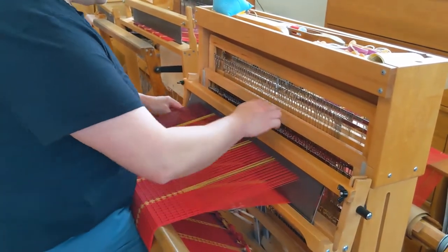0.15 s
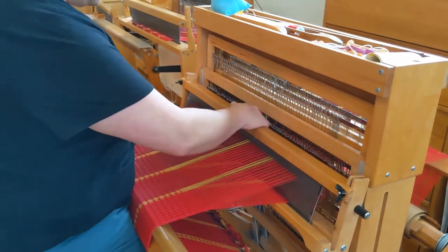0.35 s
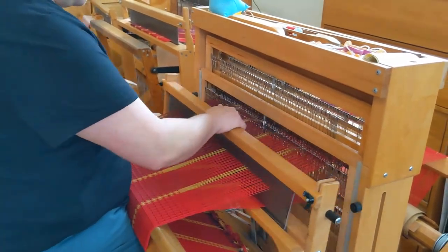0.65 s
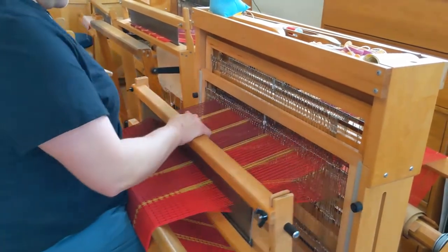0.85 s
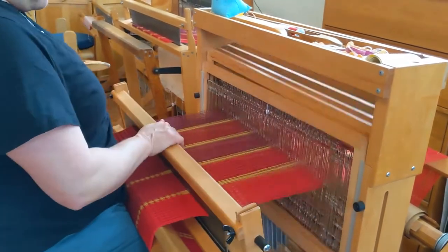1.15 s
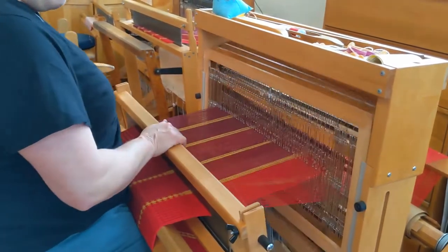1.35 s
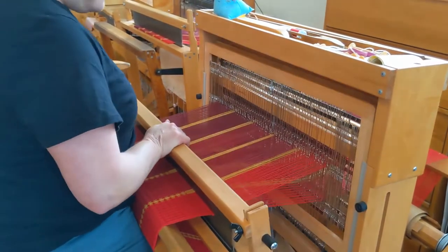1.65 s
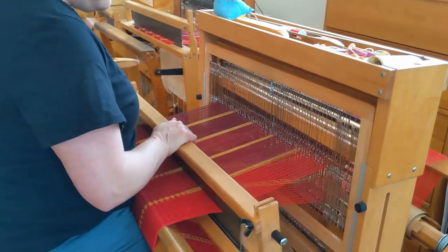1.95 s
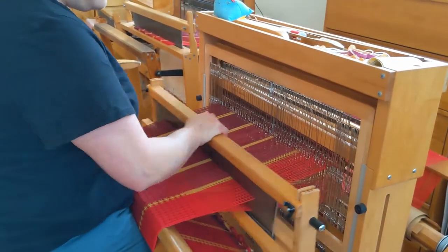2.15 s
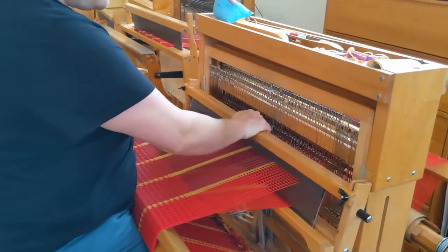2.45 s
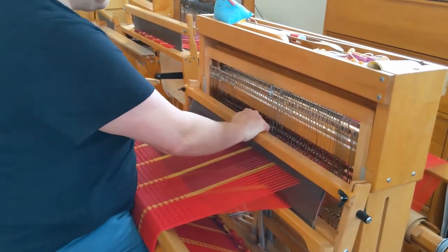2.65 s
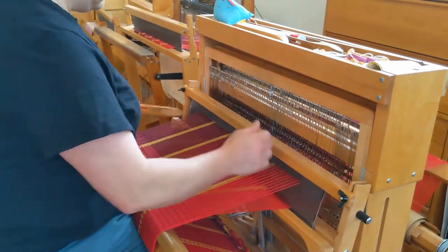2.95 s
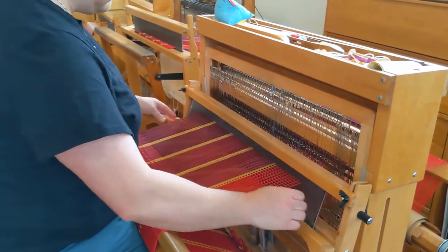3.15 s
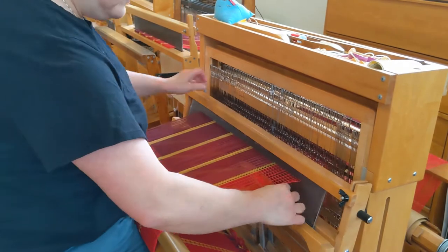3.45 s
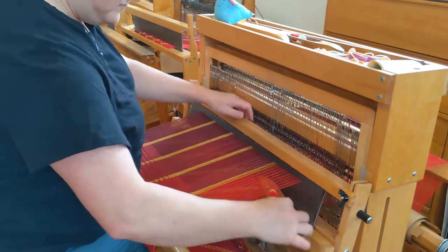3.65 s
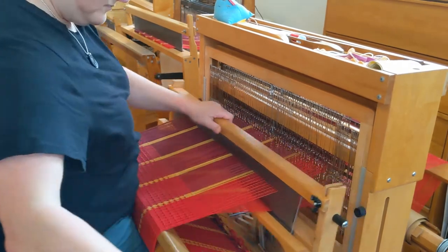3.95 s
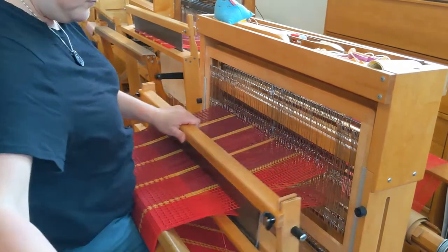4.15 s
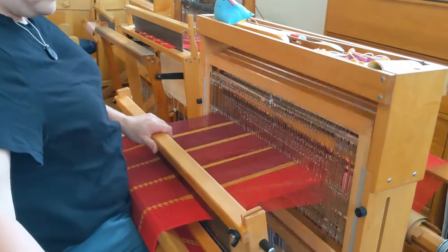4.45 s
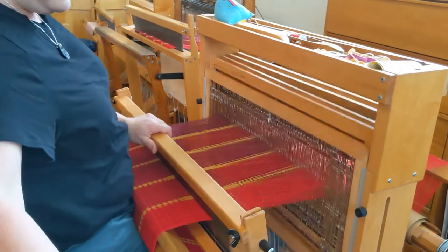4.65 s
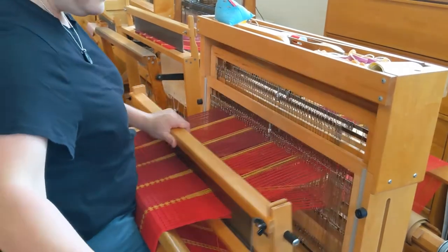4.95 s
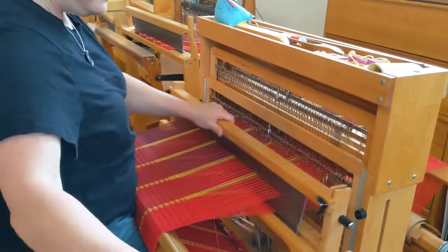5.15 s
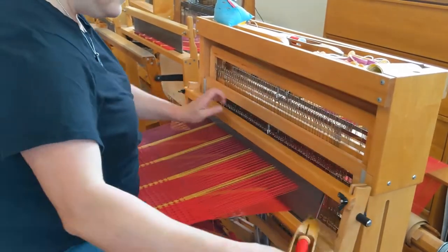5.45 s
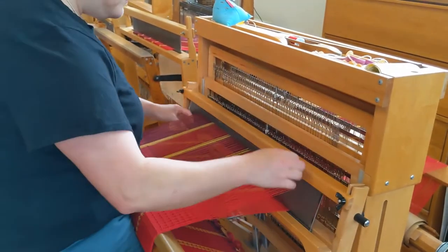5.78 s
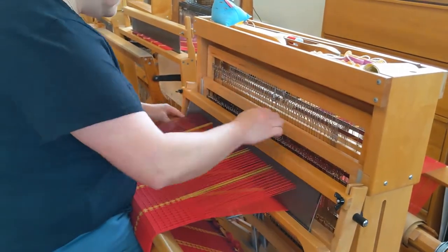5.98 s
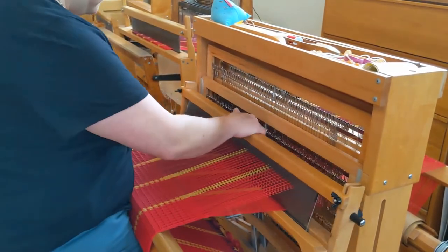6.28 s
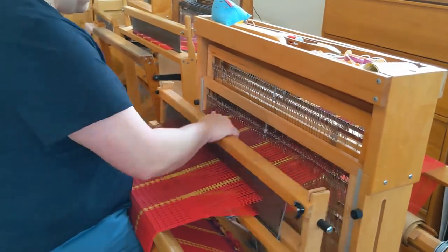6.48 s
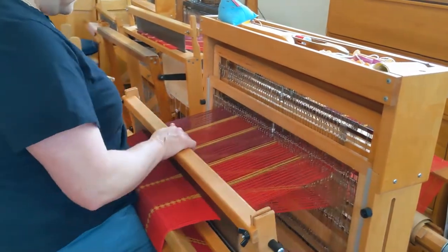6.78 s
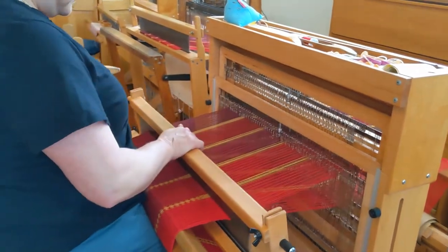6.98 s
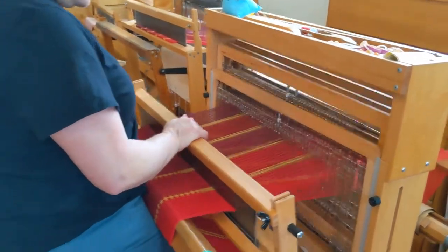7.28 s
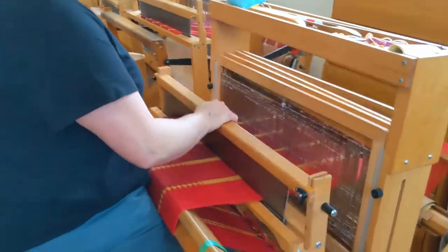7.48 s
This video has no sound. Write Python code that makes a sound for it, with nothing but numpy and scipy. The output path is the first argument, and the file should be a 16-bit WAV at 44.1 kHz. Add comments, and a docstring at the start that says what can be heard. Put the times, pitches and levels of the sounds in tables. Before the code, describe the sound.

A wooden floor loom works in an uneven cycle. A bobbin rattles in its shuttle, then wood knocks and thuds while loose metal heddles jingle. This happens three times, with a few faint, brief squeaks from the pivots, and ends on a strong jingling thud. Something briefly bumps the microphone on the right before the second rattle. The room has a short echo and a faint steady hum.

```python
"""A large studio with a wooden floor loom at work. Shafts drop and their loose metal heddles jingle over
wooden thuds, the bobbin rattles in the shuttle as yarn is drawn off, and the beater swings its reed.
Pivots squeak by stick-slip, and something brushes the right microphone port.
Air and building hum lie underneath."""
import sys
import numpy as np
from scipy import signal
from scipy.fft import rfft, irfft, next_fast_len
from scipy.io import wavfile

SR = 44100
rng = np.random.default_rng(int(sys.argv[2]) if len(sys.argv) > 2 else 0)


def transcribe(signal):
    """Save signal, clipped to [-1, 1], as a 16-bit WAV file at the path in sys.argv[1]."""
    frames = np.atleast_2d(signal).T
    limited = np.clip(frames, -1, 1)
    pcm = np.round(limited * 32767).astype(np.int16)
    wavfile.write(sys.argv[1], SR, pcm)


N = 336075
N_FFT = next_fast_len(N)
BIN_HZ = np.maximum(np.fft.rfftfreq(N_FFT, 1 / SR), 1)

# left-right coherence: f/Hz, coherence
COHERENCE = [(60, 0.9), (180, 1), (550, 0.86), (1650, 0.19), (4970, 0.015), (15000, 0.01)]


def heddles():
    """Loose heddles tick against their bars; a few strike harder and ring briefly."""
    # heddle and reed motion, per stroke: t/s, level/dB, treble lift/dB
    strokes = [
        [(0.0, -56, -4), (0.022, -40.5, -21), (0.148, -48.5, -23), (0.16, -21, -7)],
        [(1.0, -53, 0), (1.122, -45, 0), (1.164, -30.5, 2), (1.26, -35, -6), (1.284, -18.5, 0),
         (1.33, -26, 2.5), (1.444, -35, -3.5), (1.49, -19.5, 1.5), (1.664, -47.5, -5), (1.734, -36, -4.5),
         (1.99, -66.5, -18), (2.0, -55, 6)],
        [(2.54, -55, -2), (2.552, -61, 0), (2.57, -29, -9), (2.776, -48.5, -2), (2.8, -46, 13)],
        [(4.38, -49, 9), (4.408, -27.5, -1.5), (4.608, -40, -6), (4.728, -30.5, 7), (4.796, -36, -7),
         (4.85, -27.5, -3), (4.868, -16, 2), (5.032, -43, -10.5), (5.296, -56.5, -9), (5.392, -48.5, -4),
         (5.41, -31.5, -4), (5.644, -52, -5.5), (5.652, -53, 0), (5.66, -32, 0)],
        [(5.95, -48, -12), (5.99, -39, -16), (6.042, -38, -10), (6.2, -49, -15)],
        [(6.87, -60, 19), (6.902, -28.5, -15), (7.202, -63, 2.5), (7.302, -40.5, -0.5), (7.438, -42, 1),
         (7.494, -34.5, -9), (7.51, -24.5, -0.5), (7.568, -33.5, 1), (7.62, -13.5, 0)],
    ]
    # jingle spectrum: f/Hz, density/dB
    spectrum = [(530, -17), (900, -6), (1230, -11), (1390, -8.5), (1720, -11), (2020, -3.5), (2250, -4.5),
                (4360, -1), (7770, -15.5), (10000, -10.5), (12400, -18.5), (15100, -19), (16000, -41)]
    ticks = contacts(per_s=5000, spread_db=1) * from_db(0.64 * wander(rate_hz=30))
    jingle = rms_one(stereo_colour(ticks, spectrum))
    wire_modes = [(hz, at_hz(spectrum, hz), 40 / hz) for hz in np.geomspace(1300, 11000, 18)]
    strikes = contacts(per_s=35, spread_db=3.5)
    rings = rms_one(resonate(wire_modes, lambda hz: np.roll(strikes, rng.integers(N), axis=1)))
    return shape_strokes(rms_one(jingle + from_db(-5.5) * rings), strokes, corner_hz=6060)


def bobbin():
    """The loose bobbin chatters, rubs and knocks in the hollow shuttle; mode strengths drift as it shifts."""
    # bobbin spin, per stroke: t/s, level/dB, treble lift/dB
    strokes = [
        [(0.14, -60, -2), (0.148, -58, -9), (0.158, -27, 1.5), (0.392, -51, -3), (0.422, -36, -5),
         (0.432, -33.5, 5.5), (0.574, -42, 2), (0.59, -37, 1), (0.634, -45, 9), (0.65, -34.5, 3),
         (1.034, -48.5, -2.5), (1.072, -44, -7), (1.12, -51, 0)],
        [(3.13, -101, -17), (3.174, -37.5, 2), (3.286, -33.5, 1.5), (3.42, -43.5, -4), (3.444, -38, 4.5),
         (3.48, -36, -10), (3.504, -29.5, 7), (3.694, -29, -1), (3.83, -51, 4), (3.856, -21.5, 2),
         (4.02, -34, 0.5), (4.29, -37.5, -12), (4.322, -51, 2), (4.332, -27.5, -25), (4.364, -47, 4),
         (4.39, -54, -3)],
        [(5.64, -70, -4), (5.656, -25.5, -5), (5.702, -41.5, 0), (5.782, -34.5, 0.5), (5.864, -34.5, -2.5),
         (5.874, -28, 4), (5.896, -24, 1.5), (5.906, -29.5, 1.5), (5.99, -37.5, 4.5), (6.042, -33.5, 12),
         (6.184, -35.5, -2), (6.44, -35, 6.5), (6.684, -37, 2), (6.752, -52.5, 4), (6.878, -47.5, 2),
         (6.9, -31, 16)],
    ]
    # hard knocks on the shuttle: t/s, level/dB, favoured f/Hz
    hits = [(0.1556, -21, 2530), (0.4303, -17, 2580), (0.6454, -28.5, 2610), (3.174, -22.5, 2990),
            (3.2634, -19.5, 3030), (3.2778, -19, 2430), (3.4402, -26, 2670), (3.5085, -11, 2600),
            (3.5146, -17, 2530), (3.592, -23, 2600), (3.6805, -20.5, 2960), (3.8433, -17, 1950),
            (3.8554, -7.5, 1600), (3.9091, -20, 2330), (3.947, -12, 2560), (4.0763, -21, 4830),
            (4.1079, -16, 2550), (4.2585, -29.5, 2570), (4.3295, -27, 2560), (5.6523, -20, 1800),
            (5.784, -22.5, 2500), (5.8725, -22, 1620), (5.8877, -16, 2600), (6.031, -30, 2550),
            (6.2509, -35, 2380)]
    # shuttle and bobbin modes: f/Hz, level/dB, t60/s
    modes = [(1270, -30, 0.0092), (1602, -6.5, 0.03), (1940, -15.5, 0.036), (2358, -4, 0.027),
             (2524, -5, 0.047), (2688, 4.5, 0.0094), (2906, -2, 0.019), (3136, -8.5, 0.028),
             (4004, -1, 0.0096), (4750, -7, 0.017), (5377, -0.5, 0.0095), (6090, -5, 0.0076),
             (8740, -12, 0.014), (10070, -2.5, 0.0018)]
    kicks = np.abs(contacts(per_s=70, spread_db=3)[0])
    bounces = signal.lfilter([1], [1, -np.exp(-1 / (0.003 * SR))], kicks)   # 3 ms decay
    ticks = contacts(per_s=2500, spread_db=3) * (1 + 0.8 * rms_one(bounces))

    def force(hz):
        return np.roll(ticks, int(hz / 20), axis=1) * from_db(4.86 * wander(rate_hz=7))

    chatter = rms_one(resonate(modes, force))
    rattle = rms_one(chatter + from_db(-3) * yarn_rub())
    blows = knocks(hits, modes, fall_db_oct=4.5, gain_db=0.5, contact_s=0.003, crack_db=-8)
    sound = shape_strokes(rattle, strokes, corner_hz=3480) + blows
    return butterworth(sound, 3, [1150, 12500], "band")   # too small for bass, too soft for top treble


def yarn_rub():
    """Yarn and bobbin friction: dense, nearly even contacts."""
    # rub spectrum: f/Hz, density/dB
    spectrum = [(710, -55), (1200, -74), (1580, -22), (1760, -6), (3060, 3.5), (3500, -14), (5440, -7.5),
                (8640, -20), (14000, -57)]
    return rms_one(stereo_colour(contacts(per_s=7600, spread_db=0.5), spectrum))


def frame():
    """Joints bump and knock in the wooden frame, which stands on hollow boards."""
    # shaking by treadles, shafts and beater: t/s, level/dB, boom re rumble/dB
    shaking = [(0.0, -44, -13.5), (0.02, -53.5, -14), (0.87, -66, -6), (1.31, -37, -13.5),
               (1.44, -43.5, -8), (1.48, -35.5, -1), (1.68, -54, -11), (1.74, -45.5, -11), (1.97, -60, -7),
               (2.52, -77, 7), (2.59, -33.5, -13), (2.74, -52, -1), (2.8, -43, -14), (2.84, -67, 7),
               (2.97, -67, 1), (3.05, -59, 7), (3.1, -77, 20), (3.18, -40, -24), (3.4, -59, 3),
               (3.46, -40, -7.5), (3.65, -48, -15), (4.29, -70.5, 2), (4.43, -40.5, -12), (4.65, -38, -19),
               (4.79, -50, -8), (4.86, -30.5, -14), (4.92, -37.5, -7.5), (5.2, -60.5, -8), (5.39, -61, 3),
               (5.41, -30.5, -10.5), (5.62, -54, -10), (5.67, -37.5, -31), (5.71, -42.5, -20),
               (5.86, -48.5, -11), (5.88, -38, -19), (5.94, -47.5, -8), (6.07, -44.5, -27),
               (6.18, -58.5, -13), (6.77, -60.5, 1), (6.94, -45, -8.5), (7.24, -59.5, 9.5),
               (7.34, -38.5, -5), (7.39, -52, -10), (7.51, -37.5, -15), (7.58, -43, -1), (7.62, -24, -10)]
    # wood on wood: t/s, level/dB, favoured f/Hz
    hits = [(1.131, -29, 840), (1.229, -25, 1020), (1.275, -20, 2110), (1.477, -32, 2080),
            (1.72, -22.5, 1320), (1.799, -37.5, 448), (2.565, -17.5, 1440), (3.172, -28, 1480),
            (3.438, -35, 2160), (4.399, -33, 210), (4.718, -30, 740), (4.817, -19.5, 1340),
            (4.852, -11.5, 942), (5.41, -24, 891), (5.654, -21, 990), (5.874, -21, 1640), (6.05, -30, 860),
            (7.313, -30.5, 423), (7.339, -29, 301), (7.417, -40, 326), (7.462, -27, 754),
            (7.508, -19, 1520)]
    # frame modes: f/Hz, level/dB, t60/s
    frame_modes = [(180, -3.5, 0.049), (267.4, -2.5, 0.12), (342.5, -2.5, 0.13), (417.7, 0, 0.047),
                   (536, 7, 0.01), (713, 7, 0.028), (820, -3.5, 0.038), (942.3, 3.5, 0.074),
                   (1216.6, 6.5, 0.013), (1303, 13, 0.0092), (1650, 5, 0.023), (2060, -2, 0.0099)]
    # floorboard modes: f/Hz, level/dB, t60/s
    board_modes = [(34, -9, 0.16), (55.4, -2.5, 0.21), (88.4, -5, 0.16), (116.8, -5.5, .15)]
    rumble_db, boom_db = stroke_curves(shaking)
    bumps = contacts(per_s=1500, spread_db=3)
    rumble = rms_one(resonate(frame_modes, lambda hz: np.roll(bumps, int(hz), axis=1)))
    boom = rms_one(resonate(board_modes, lambda hz: bumps))
    blows = knocks(hits, frame_modes, fall_db_oct=11, gain_db=2, contact_s=0.006, crack_db=-29)
    return from_db(rumble_db - 2.5) * (rumble + from_db(boom_db) * boom) + blows


def creaks():
    """Stick-slip in pivots and cords: narrow noise on a gliding pitch."""
    # squeaks: t/s, length/s, start f/Hz, end f/Hz, level/dB
    squeaks = [(2.365, 0.11, 4200, 4260, -53.5), (2.365, .06, 4850, 4900, -61),
               (2.42, .07, 5300, 4870, -52), (2.44, 0.062, 4400, 4380, -53), (2.49, .04, 5150, 4950, -57),
               (2.49, 0.072, 4180, 3900, -53), (1.155, 0.024, 4300, 4300, -33),
               (4.625, 0.032, 1750, 1730, -36.5), (4.695, .1, 2480, 2505, -32.5),
               (7.27, 0.14, 2584, 2440, -46), (7.285, 0.027, 3380, 3440, -43)]
    out = np.zeros((2, N))
    waver = rms_one(butterworth(rng.standard_normal((2, N)), 2, 110, "low"))
    for k, (start_s, length_s, start_hz, end_hz, level_db) in enumerate(squeaks):
        i, n = int(start_s * SR), int(length_s * SR)
        phase = 2 * np.pi * np.cumsum(np.linspace(start_hz, end_hz, n)) / SR
        swell = np.sqrt(2 * np.hanning(n))
        own_waver = waver[:, k * 20000:k * 20000 + n]
        out[:, i:i + n] += from_db(level_db) * swell * np.sin(phase) * own_waver
    return out


def port_touches():
    """A damped pressure swing and crackle at the right port; the left gets the swing, faint and late."""
    # touches: t/s, level/dB, swing f/Hz, crackle re swing/dB
    touches = [(2.332, -46, 147, -40), (2.517, -46, 199, -40), (2.765, -32, 300, -30),
               (2.7802, -16, 610, -30), (2.783, -16, 910, -8), (2.7987, -15, 560, 17),
               (2.8075, -12, 517, -6), (3.008, -42, 69, -40), (3.033, -28.5, 90.5, -46),
               (3.056, -24.5, 243, -16), (6.582, -36.5, 93.5, -40), (2.05, -53, 100, -31),
               (6.72, -45, 119, -40)]
    out, t = np.zeros((2, N)), np.arange(3000) / SR
    for start_s, level_db, hz, crackle_db in touches:
        swing = np.sin(2 * np.pi * hz * t + 0.5) * np.exp(-(1.05 * hz * t) ** 2)
        crackle = from_db(crackle_db) * rng.standard_normal(len(t)) * np.exp(-t / 0.0003)
        right = int(start_s * SR)
        left = right + 90
        out[1, right:right + len(t)] += from_db(level_db) * (swing + crackle)
        out[0, left:left + len(t)] -= from_db(level_db - 22) * swing
    return out


def reverb(sound):
    """Studio reflections: a noise tail that decays by octave band."""
    # decay time: f/Hz, t60/s
    t60_s = [(60, 0.48), (400, 0.48), (1500, 0.42), (4000, 0.78), (9000, 0.53), (15000, 0.47)]
    t, edges_hz = np.arange(SR) / SR, 30 * 2.0 ** np.arange(10)
    tail = 0
    for low_hz, high_hz in zip(edges_hz, edges_hz[1:]):
        hz = np.sqrt(low_hz * high_hz)
        mid, side = butterworth(rng.standard_normal((2, SR)), 2, [low_hz, high_hz], "band")
        tail = tail + left_right(mid, side, hz) * from_db(-60 * t / at_hz(t60_s, hz))
    fade_in = np.clip(t / 0.004, 0, 1)
    tail = rms_one(tail * fade_in) / np.sqrt(SR)
    return signal.fftconvolve(sound.mean(0)[None], tail, axes=1)[:, :N]


def studio_hum():
    """Air and building hum: steady coloured noise."""
    # hum spectrum: f/Hz, density/dB
    spectrum = [(13, -30), (22, -9.5), (48, 1.5), (70, -16.5), (103, -9.5), (140, -21), (174, -8),
                (200, -16), (319, -11), (482, -6.5), (885, -16.5), (4500, -10.5), (7810, -26.5),
                (8970, -15), (16000, -40)]
    return rms_one(stereo_colour(rng.standard_normal((2, N)), spectrum))


def knocks(hits, modes, fall_db_oct, gain_db, contact_s, crack_db):
    """Loose parts meet in a flurry of contacts; modes weaken away from each hit's favoured pitch."""
    n = 600
    t = np.arange(n) / SR
    flurry = np.exp(-t / contact_s) / np.sqrt(contact_s * SR)
    mode_hz, mode_db, _ = np.transpose(modes)

    def force(hz):
        push = np.zeros((2, N + n))
        for start_s, level_db, favoured_hz in hits:
            i = int(start_s * SR)
            weight = from_db(-fall_db_oct * abs(np.log2(hz / favoured_hz)))
            all_modes = from_db(mode_db - fall_db_oct * abs(np.log2(mode_hz / favoured_hz)))
            share = weight / np.linalg.norm(all_modes)   # the modes share the blow's energy
            push[:, i:i + n] += from_db(level_db + gain_db) * share * flurry * rng.choice([-1, 1], (2, n))
        return push[:, :N]

    crack = np.zeros((2, N + n))   # bright tick of first contact
    crack_decay = np.exp(-t / 0.0017)
    for start_s, level_db, _ in hits:
        i = int(start_s * SR)
        crack[:, i:i + n] += from_db(level_db + crack_db) * crack_decay * rng.standard_normal((2, n))
    return resonate(modes, force) + butterworth(crack[:, :N], 2, [4000, 12000], "band")


def resonate(modes, force):
    """Sum of damped modes, each driven by the mid/side pair force(hz)."""
    out = 0
    for hz, level_db, t60_s in modes:
        radius, angle = from_db(-60 / (t60_s * SR)), 2 * np.pi * hz / SR
        feedforward = [0, from_db(level_db) * np.sin(angle)]
        feedback = [1, -2 * radius * np.cos(angle), radius ** 2]
        mid, side = signal.lfilter(feedforward, feedback, force(hz) + 1e-18)
        out = out + left_right(mid, side, hz)
    return out


def contacts(per_s, spread_db):
    """Random impulses of uneven size, rms 1; mid and side differ in signs only."""
    sizes = from_db(spread_db * np.minimum(rng.exponential(1, N), 3))
    occurs = rng.random(N) < per_s / SR
    return rms_one(sizes * occurs * rng.choice([-1, 1], (2, N)))


def shape_strokes(sound, strokes, corner_hz):
    """Gate a sound by strokes, applying their level and their treble lift above the corner."""
    t = np.arange(N) / SR
    low_gain, high_gain = np.zeros((2, N))
    for rows in strokes:
        level_db, lift_db = stroke_curves(rows)
        gate = (t >= rows[0][0]) & (t <= rows[-1][0])
        low_gain += from_db(level_db) * gate
        high_gain += from_db(level_db + lift_db) * gate
    low, high = (butterworth(sound, 3, corner_hz, kind) for kind in ("low", "high"))
    return low * low_gain + high * high_gain


def stroke_curves(rows):
    """Both dB columns of a stroke, per sample; a quick rise is an impact and comes late."""
    times_s, level_db, relative_db = np.transpose(rows)
    position = np.interp(np.arange(N) / SR, times_s, np.arange(len(rows)))
    row = np.minimum(position.astype(int), len(rows) - 2)
    impact = (np.diff(times_s) < 0.03) & (np.diff(level_db) > 6)
    progress = (position - row) ** np.where(impact[row], 3, 1)
    return [db[row] + np.diff(db)[row] * progress for db in (level_db, relative_db)]


def wander(rate_hz):
    """Random drift: straight lines between unit normal values."""
    values = rng.standard_normal(int(N / SR * 40) + 2)
    return np.interp(np.arange(N) / SR * rate_hz, np.arange(len(values)), values)


def stereo_colour(mid_side, spectrum):
    """Filter a mid/side pair by a spectrum; return left and right."""
    mid, side = rfft(mid_side, N_FFT) * from_db(at_hz(spectrum, BIN_HZ))
    return irfft(left_right(mid, side, BIN_HZ), N_FFT)[:, :N]


def left_right(mid, side, hz):
    """Mid/side to the two ports, which hear alike in the bass only."""
    coherence = at_hz(COHERENCE, hz)
    return np.sqrt(1 + coherence) * mid + np.sqrt(1 - coherence) * side * [[1], [-1]]


def butterworth(x, order, corner_hz, kind):
    """Causal Butterworth filter."""
    return signal.sosfilt(signal.butter(order, corner_hz, kind, fs=SR, output="sos"), x)


def at_hz(points, hz):
    """Read an (f/Hz, value) table on a log axis."""
    points_hz, values = np.transpose(points)
    return np.interp(np.log(hz), np.log(points_hz), values)


def from_db(db):
    """Decibels to gain."""
    return 10 ** (np.asarray(db) / 20)


def rms_one(x):
    """Scale to unit rms."""
    return x / np.sqrt(np.mean(x ** 2) + 1e-20)


def scene():
    """The loom and its reverberation, with hum and port touches."""
    loom = heddles() + frame() + bobbin() + creaks()
    hum = from_db(-59) * studio_hum()
    return loom + from_db(-7) * reverb(loom) + hum + port_touches()


def record(dry):
    """The two ports differ in colour; peaks are rounded and the top is cut."""
    # port imbalance: f/Hz, left re right/dB
    imbalance = [(60, -6.5), (110, -1), (200, -2.5), (380, -2.5), (700, -2), (1290, -0.5), (2380, -1.5),
                 (4400, 0.5), (8120, 7.5), (15000, 6)]
    port_gains = from_db(at_hz(imbalance, BIN_HZ) * [[0.5], [-0.5]])
    coloured = irfft(rfft(dry, N_FFT) * port_gains, N_FFT)[:, :N]
    rounded = 0.8 * np.tanh(coloured / 0.8)
    return signal.sosfilt(signal.cheby2(14, 70, 16400, fs=SR, output="sos"), rounded)


dry = scene()
out = record(dry)
transcribe(out)
```